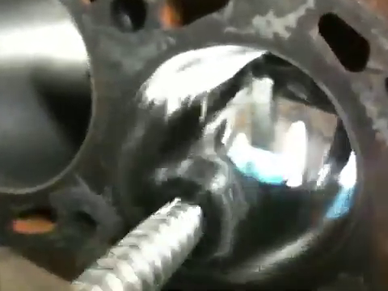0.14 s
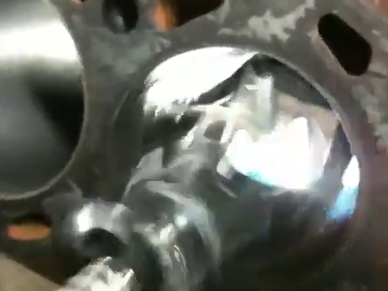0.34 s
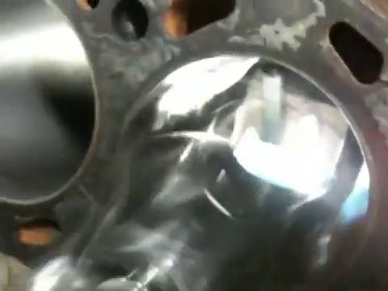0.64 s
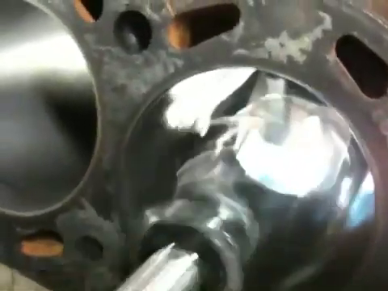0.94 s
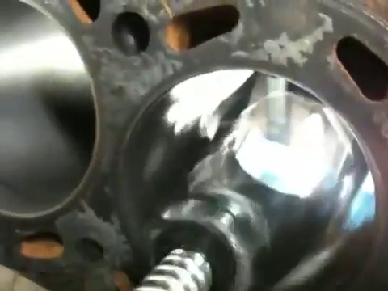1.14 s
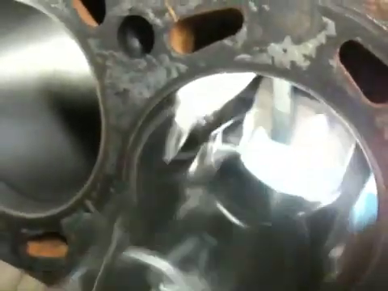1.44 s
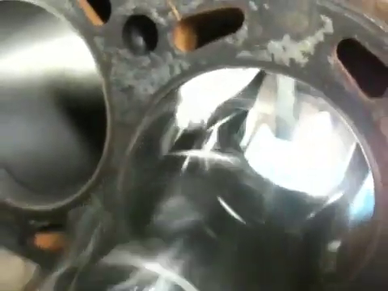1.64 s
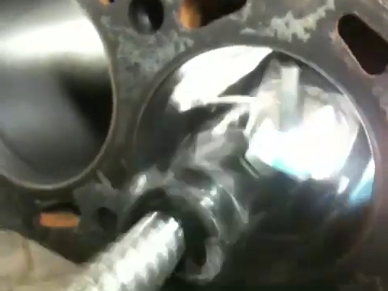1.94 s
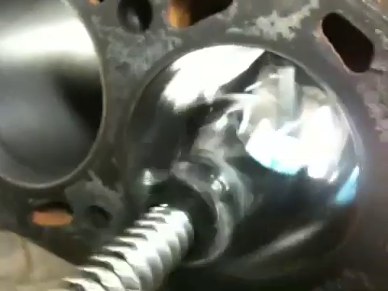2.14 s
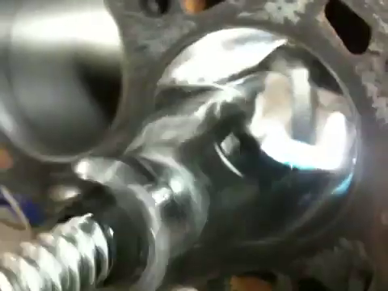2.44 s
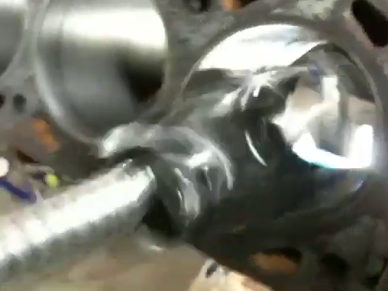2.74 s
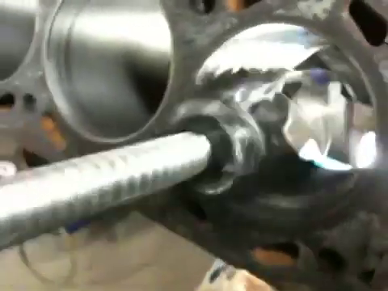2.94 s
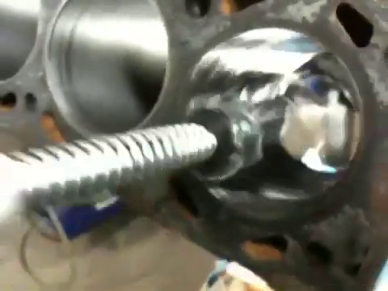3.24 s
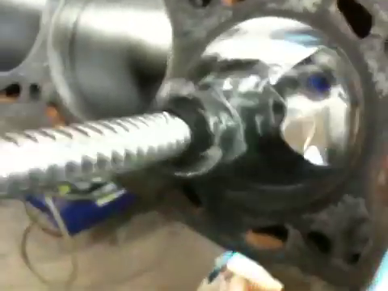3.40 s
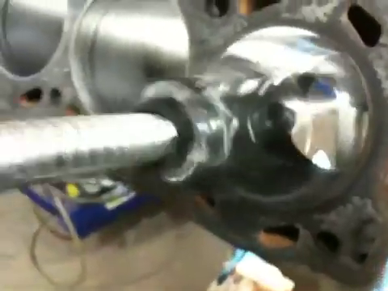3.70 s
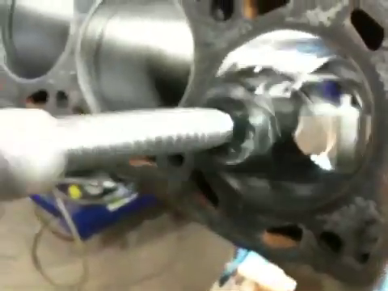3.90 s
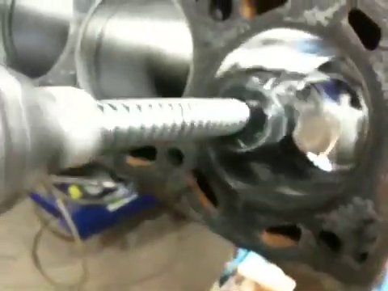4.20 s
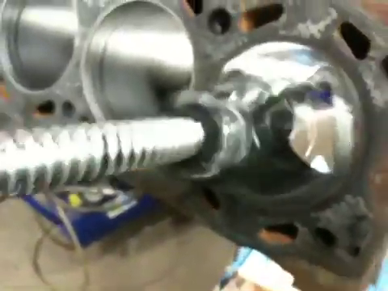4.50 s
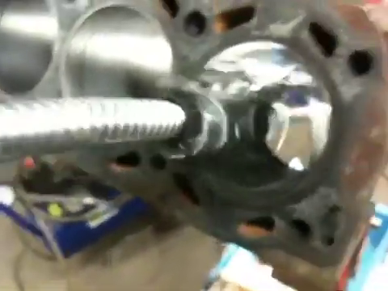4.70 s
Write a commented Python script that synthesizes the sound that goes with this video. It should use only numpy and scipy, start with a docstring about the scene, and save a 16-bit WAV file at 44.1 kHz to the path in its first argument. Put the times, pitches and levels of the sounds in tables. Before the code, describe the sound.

A hand drill whines continuously while a stone hone scrapes and hisses up and down inside an iron engine cylinder, with brief screeches.

```python
"""A hand drill spins a stone hone up and down an engine cylinder, close to the microphone in a workshop.
The drill's gears whine as three tooth-mesh harmonics that throb once a spindle turn and rattle loosely.
Each stroke sags the whine and shifts its colour, and it climbs as the load eases.
Filtered noise makes the rush of the motor's fan and brushes; random grit impulses scrape and chatter
on the iron wall and ring the stones and bore, and now and then a stone catches and screeches."""
import sys
import numpy as np
from scipy import signal
from scipy.fft import rfft, irfft
from scipy.io import wavfile
from scipy.ndimage import uniform_filter1d, map_coordinates

SR = 44100
rng = np.random.default_rng(int(sys.argv[2]) if len(sys.argv) > 2 else 0)


def master(y):
    """Save y as 16-bit WAV."""
    cut = np.clip(np.atleast_2d(y).T, -1, 1)
    pcm = np.round(cut * 32767)  # scale
    wavfile.write(sys.argv[1], SR, pcm.astype(np.int16))


N = 214237


def undb(db):
    """Decibels to amplitude gain."""
    return 10 ** (np.asarray(db) / 20)


def unit(x):
    """Scale to rms 1."""
    return x / np.sqrt(np.mean(x ** 2))


def curves(table):
    """Draw each column of a table of timed rows as an automation curve, one value a sample."""
    s, *columns = np.transpose(table)
    return [np.interp(np.arange(N) / SR, s, c) for c in columns]


def walk(rate):
    """Smooth chance modulation of rms 1 that changes about rate times a second."""
    hz = np.arange(N // 2 + 1) * SR / N
    lowpass = 1 / (1 + (hz / rate) ** 4)
    return unit(irfft(rfft(rng.standard_normal(N)) * lowpass, N))


def shape(x, gain_at):
    """Causal minimum-phase filter whose gain at each frequency is gain_at(Hz); rms 1."""
    size = 2 ** 18
    hz = np.maximum(np.arange(size // 2 + 1) * SR / size, 1)
    cepstrum = irfft(np.log(gain_at(hz)))
    # fold the cepstrum onto positive time
    cepstrum[1:size // 2] *= 2
    cepstrum[size // 2 + 1:] = 0
    response = np.exp(rfft(cepstrum))
    return unit(irfft(rfft(x, size) * response)[:N])


def colour(x, points):
    """Equalise x along a curve of (Hz, dB) points, straight on a log-frequency axis."""
    hz, db = np.transpose(points)
    return shape(x, lambda f: undb(np.interp(np.log(f), np.log(hz), db)))


def ring(x, modes):
    """Pass x through resonances with steep skirts, summed in power."""
    def gain_at(f):
        power = 0
        for hz, width, db in modes:
            detuning = (f - hz * hz / f) / (1.19 * width)
            power = power + (undb(db) / (1 + detuning ** 2)) ** 2
        return np.sqrt(power)
    return shape(x, gain_at)


def wander(x, share, rate):
    """Vary the playback speed of x by a small rms share, about rate times a second, so its pitches drift."""
    place = np.cumsum(1 + share * walk(rate))
    return map_coordinates(x, [place], order=3, mode="mirror")


def grit(per_second, spread_db):
    """Tiny fractures of stone and iron as random impulses of uneven size."""
    struck = rng.random(N) < per_second / SR
    sign = rng.choice([-1, 1], N)
    size_db = spread_db * np.minimum(rng.exponential(size=N), 5)
    return unit(struck * sign * undb(size_db))


# turning points of the hand, about twice a second: t/s, depth in the bore/0-1
STROKE_TURNS = [(-0.43, 0.3), (0.18, 0.9), (0.63, 0.1), (1.18, 0.76), (1.72, 0.0), (2.21, 0.8), (2.66, 0.0),
                (3.21, 0.87), (3.68, 0.37), (4.1, 0.74), (4.72, 0.49), (5.2, 0.6)]


def stroke():
    """The hand eases between turning points: depth, and drag, greatest about a third of the way."""
    s, depths = np.transpose(STROKE_TURNS)
    count = np.arange(len(s))
    done, part = np.divmod(np.interp(np.arange(N) / SR, s, count), 1)
    depth = np.interp(done + np.sin(np.pi * part / 2) ** 2, count, depths)
    drag = np.sin(np.pi * part ** .7) ** 2
    return np.clip(depth, 0, 1), drag


# drill speed before stroke drag and waver: t/s, tooth mesh f/Hz
DRILL_SPEED = [(0.0, 802.5), (1.4, 809.4), (2.2, 815.9), (2.8, 810.8), (3.15, 837.1), (3.6, 836.4),
               (4.15, 863.7), (4.45, 894.9), (4.86, 895.7)]
SAG_HZ = 12  # at full drag
WAVER_HZ, WAVERS_PER_S = 2.5, 9


def mesh_rate(drag):
    """The load of each stroke drags the tooth mesh rate down a little, and it wavers by chance (Hz)."""
    return curves(DRILL_SPEED)[0] - SAG_HZ * drag + WAVER_HZ * walk(WAVERS_PER_S)


def resonance_db(hz, peak_hz, width_hz):
    """Level of a tone as it glides through a resonance; 0 dB at the peak."""
    return -10 * np.log10(1 + (2 * (hz - peak_hz) / width_hz) ** 2)


WORKING_HZ, FREEING_HZ = 805, 40  # mesh rate under load, and the rise over which the gears run free
# nominal gear levels: base (hone at the top), change at full depth, gain when running free
FIRST_DB, FIRST_DEEP_DB, FIRST_FAST_DB = -48.5, -1, 6.5
# base, the depth at which the tone nearly vanishes (0-1), and the share left there
SECOND_DB, SECOND_NODE, SECOND_LEFT = -21, 0.3, 0.19
SECOND_PEAK_HZ, SECOND_WIDTH_HZ = 1737, 100
SECOND_LOAD = 0.93  # dB for each dB of a surge in pressure
THIRD_DB, THIRD_DEEP_DB = -27.5, -13.5
THIRD_PEAK_HZ, THIRD_WIDTH_HZ = 2513, 390


def gear_levels(mesh_hz, depth, surge_db):
    """Depth trades the third harmonic for the second; speed carries each through a resonance (dB)."""
    faster = np.tanh((mesh_hz - WORKING_HZ) / FREEING_HZ)
    first_db = FIRST_DB + FIRST_DEEP_DB * depth + FIRST_FAST_DB * faster

    node_db = 20 * np.log10(np.hypot(depth - SECOND_NODE, SECOND_LEFT))
    second_db = SECOND_DB + node_db + SECOND_LOAD * surge_db
    second_db = second_db + resonance_db(2 * mesh_hz, SECOND_PEAK_HZ, SECOND_WIDTH_HZ)

    third_db = THIRD_DB + THIRD_DEEP_DB * depth ** 1.66
    third_db = third_db + resonance_db(3 * mesh_hz, THIRD_PEAK_HZ, THIRD_WIDTH_HZ)
    return first_db, second_db, third_db


MESHES_PER_TURN = 35.03  # of the spindle


def throb(teeth, depth, lag, ripple):
    """The load on the gears swells once a spindle turn and ripples with the hone's three stones."""
    turns = teeth / MESHES_PER_TURN
    stones = 3
    swell = depth * np.cos(2 * np.pi * (turns - lag))
    stone_ripple = ripple * np.cos(2 * np.pi * stones * (turns - .26))
    return unit(1 + swell + stone_ripple)


MESHES_PER_MOTOR_TURN = 7


def whine(teeth, first_db, second_db, third_db):
    """Tooth-mesh harmonics roughened by backlash; motor shaft and poles add sidebands to the third."""
    shaft = 2 * np.pi * teeth / MESHES_PER_MOTOR_TURN
    poles = 3
    torque = 1 + .2 * np.sin(poles * shaft) + .2 * np.cos(shaft)
    phase = 2 * np.pi * teeth + .055 * walk(90)
    # the added dB take each nominal level to its sine amplitude
    first = undb(first_db + 3.5) * np.sin(phase)
    first = first * throb(teeth, depth=0.14, lag=0.17, ripple=0.13) * unit(1 + 0.73 * walk(40))
    second = undb(second_db + 3.9) * np.sin(2 * phase)
    second = second * throb(teeth, depth=.36, lag=.1, ripple=.22) * unit(1 + .2 * walk(50))
    third = undb(third_db + 3.8) * np.sin(3 * phase)
    third = third * throb(teeth, depth=.72, lag=.08, ripple=.19) * unit(1 + .1 * walk(30))
    return first + second + third * torque


# ring of the gear case: f/Hz, nominal width/Hz, relative level/dB
CASE_RING = [(880, 300, -3.5), (1225, 110, -4), (1735, 375, -1.5)]
# ring of the spindle: f/Hz, nominal width/Hz, relative level/dB
SPINDLE_RING = [(2470, 150, -2.7), (3634, 77, 3)]


def rattle(teeth, first_db, third_db):
    """Loose teeth clatter in the gear case and along the spindle, hardest at the tight spot of each turn."""
    knocks = grit(per_second=5000, spread_db=5.5)
    case_load = throb(teeth, depth=0.39, lag=0.12, ripple=0.055)
    case = ring(knocks * case_load, CASE_RING) * undb(first_db + 6.5)
    tight_spot = throb(teeth, depth=.85, lag=.08, ripple=.2)
    spindle = ring(knocks * tight_spot, SPINDLE_RING) * undb(third_db - 10.5)
    return case + spindle


# colour of the fan and brush rush: f/Hz, relative level/dB
RUSH_COLOUR = [(30, -41), (55, -38), (95, -26), (125, -16.5), (250, -9), (600, -2), (1400, -2.5), (2200, 6),
               (3200, 4.5), (6000, -13.5), (9500, -8.5), (14000, 6), (16000, -40)]
# air in the bores and the motor housing: f/Hz, nominal width/Hz, relative level/dB
AIR_RING = [(165, 24, -8), (195.8, 5.5, -0.5), (335, 187, -8.5), (494, 72, -2), (786, 500, -5),
            (1130, 320, -7), (1710, 600, 1.5), (2040, 910, -0.5), (2480, 370, 0)]
RUSH_DB, HOLLOW_DB = -29, -32.5


def motor():
    """Fan air and brush noise, partly ringing in the housing and the open bores."""
    direct = colour(rng.standard_normal(N), RUSH_COLOUR)
    hollow = ring(grit(per_second=6000, spread_db=2.0), AIR_RING)
    return undb(RUSH_DB) * direct + undb(HOLLOW_DB) * hollow


SWAY_HZ, SWAY_PEAK_S, SWAY_DB = 4.87, 0.062, 0.9  # the hone sways on its flexible shaft
UNEVEN_HZ, UNEVEN_DB = 16, 0.97  # chance unevenness of the contact


def sway():
    """The hone swings against the wall about five times a second, and contact is never quite even (dB)."""
    t = np.arange(N) / SR
    swing_db = SWAY_DB * np.cos(2 * np.pi * SWAY_HZ * (t - SWAY_PEAK_S))
    return swing_db + UNEVEN_DB * walk(UNEVEN_HZ)


# how hard the stones press, before depth loss and surges: t/s, level/dB
STONE_PRESSURE = [(0.0, -1.5), (0.38, -0.2), (0.68, 0.4), (0.88, 1.6), (0.97, 0), (1.1, 0.9), (1.45, -0.6),
                  (1.78, 0.5), (2.0, -1.4), (2.2, 0.5), (2.42, -2.0), (2.76, -0.5), (3.03, -2.5),
                  (3.32, 0.5), (3.5, -2.5), (3.98, -2.5), (4.62, -6.5), (4.86, -5.5)]
# levels of the wall's rasp and of the fine hiss at 0 dB pressure: t/s, rasp level/dB, hiss level/dB
GRAIN_LEVELS = [(0.0, -24.5, -21.5), (0.8, -25.5, -22), (1.4, -25.5, -21.5), (2.2, -25.5, -20.5),
                (3.0, -27.0, -21.0), (3.8, -27.5, -21.5), (4.86, -24, -21.5)]
# ring of the stones and their arms: f/Hz, nominal width/Hz, relative level/dB
STONE_RING = [(6340, 640, 5), (6985, 230, 5), (7600, 750, 4.5), (7920, 430, 6)]
# ring of the cylinder wall: f/Hz, nominal width/Hz, relative level/dB
WALL_RING = [(2810, 120, -1), (3605, 256, 2.5), (4060, 204, 2), (4660, 540, 2), (5460, 940, 0.5)]
# colour of the fine hiss of the grit: f/Hz, relative level/dB
HISS_COLOUR = [(300, -50), (3000, -18), (6000, -1.5), (8500, 4), (9500, -1), (10400, 5.5), (12200, 4),
               (13000, -1), (14200, -9), (15400, -4.5), (17200, -5)]
# low rumble of the engine block: f/Hz, nominal width/Hz, relative level/dB
BLOCK_RING = [(90, 24, 1.5), (167, 30, 10)]
DEPTH_LOSS_DB = 2  # the scraping is fainter from the bottom of the bore
STONES_DB, BLOCK_DB = -19.5, -63  # at 0 dB pressure


def hone(depth, surge_db):
    """Grit rings the stones and the wall; the harder the stones press, the more they stick and slip."""
    rasp_db, hiss_db = curves(GRAIN_LEVELS)
    steady_db = curves(STONE_PRESSURE)[0] - DEPTH_LOSS_DB * depth
    pressure_db = steady_db + surge_db

    bite = np.clip(1.4 + 0.15 * pressure_db, .3, 2)
    chatter_db = bite * (1.5 * walk(340) + 0.52 * walk(31))
    grains = grit(per_second=12000, spread_db=0.0) * undb(chatter_db)
    # the stones' springs hold the mean force steady
    grains /= np.sqrt(uniform_filter1d(grains ** 2, size=SR // 30))

    # the ringing shifts as the points of contact travel round the bore
    stone_ring = wander(ring(grains, STONE_RING), share=.018, rate=25)
    stones = stone_ring * undb(STONES_DB + pressure_db)
    wall_grains = grains + .7 * grit(per_second=12000, spread_db=2.6)
    wall_ring = wander(ring(wall_grains, WALL_RING), share=.015, rate=25)
    wall = wall_ring * undb(rasp_db + 1.08 * steady_db + 1.04 * surge_db)

    fine_grains = .5 * grains + grit(per_second=27000, spread_db=3.5)
    hiss_level_db = hiss_db + 0.99 * steady_db + 0.38 * surge_db + 0.86 * walk(22)
    hiss = colour(fine_grains, HISS_COLOUR) * undb(hiss_level_db)
    block = ring(rng.standard_normal(N), BLOCK_RING) * undb(BLOCK_DB + 1.9 * pressure_db)
    return stones + wall + hiss + block


# a stone catches and chatters: t/s, length/s, pressure rise level/dB, screech f/Hz, screech level/dB
STONE_CATCHES = [(0.188, 0.032, 4.5, 3970, -24), (0.63, 0.036, 1.5, 4700, -25),
                 (0.815, 0.035, 1.5, 6340, -22), (1.31, 0.041, 2.5, 6300, -19.5),
                 (1.498, 0.018, 2.5, 7600, -22), (1.681, 0.04, 0, 6400, -18.5),
                 (1.888, 0.028, 2.5, 7660, -20), (2.088, 0.11, 0.5, 7500, -32), (2.303, 0.04, 2, 7500, -25),
                 (2.57, 0.036, 2, 6400, -25), (2.71, 0.069, 3.5, 7500, -25), (2.928, 0.015, -2, 6600, -18),
                 (3.334, 0.011, 4, 7700, -26), (3.637, 0.018, 3, 7700, -26), (3.91, .02, 0.5, 7900, -21),
                 (4.382, .025, 0.5, 7700, -31)]


def catches():
    """A stone digs in: the pressure shifts and lets go, and the stone screeches at its own pitch."""
    t = np.arange(N) / SR
    rise_db, screech = 0, 0
    for s, length, db, hz, screech_db in STONE_CATCHES:
        grip = np.interp(t, [s - .002, s + .002, s + .8 * length, s + 1.6 * length], [0, 1, 1, 0])
        slips = grit(per_second=6300, spread_db=-6.0)
        pitched = signal.lfilter(*signal.iirpeak(hz, 8.0, fs=SR), slips)
        rise_db = rise_db + db * grip
        screech = screech + undb(screech_db) * grip * unit(pitched)
    return rise_db, screech


def scene():
    """Drill and hone together: strokes and pressure surges steer the gears and the scraping alike."""
    depth, drag = stroke()
    catch_db, screech = catches()
    surge_db = catch_db + sway()
    mesh_hz = mesh_rate(drag)
    first_db, second_db, third_db = gear_levels(mesh_hz, depth, surge_db)
    teeth = np.cumsum(mesh_hz) / SR  # tooth meshes so far
    gears = whine(teeth, first_db, second_db, third_db) + rattle(teeth, first_db, third_db)
    drill = gears + motor()
    return (drill + hone(depth, surge_db) + screech)[None]


TOP_HZ = 17300


def record(dry):
    """The microphone drops the deepest bass and cuts the top."""
    lean = signal.sosfilt(signal.butter(2, 45, "highpass", fs=SR, output="sos"), dry)
    return signal.sosfilt(signal.ellip(10, .2, 80, TOP_HZ, fs=SR, output="sos"), lean)


dry = scene()
out = record(dry)
master(out)
```